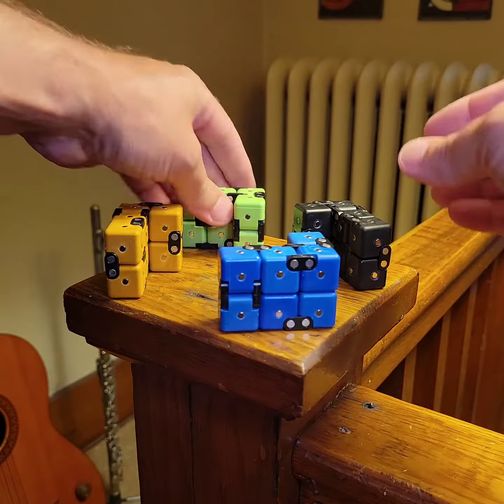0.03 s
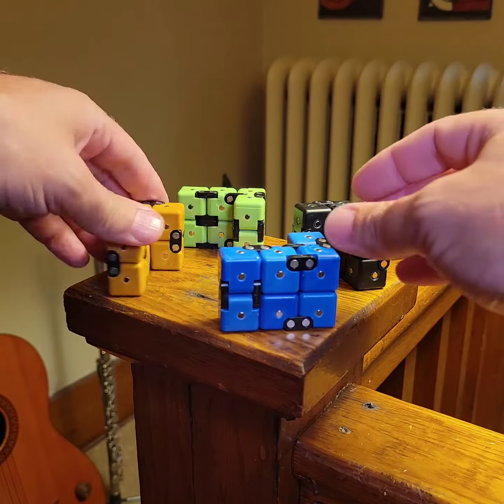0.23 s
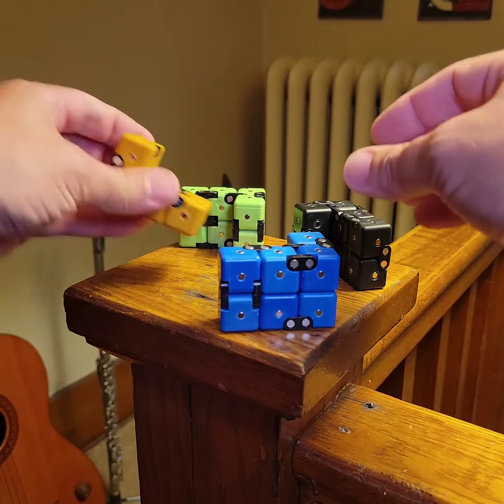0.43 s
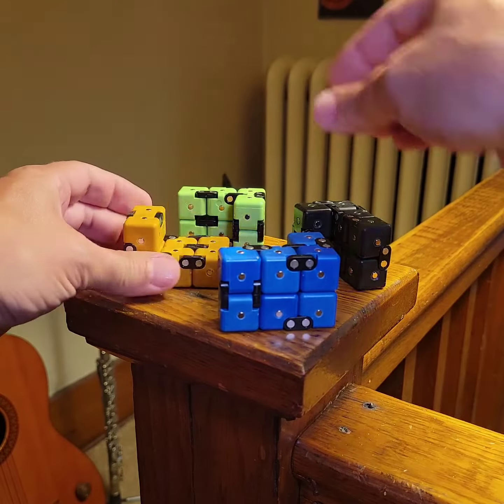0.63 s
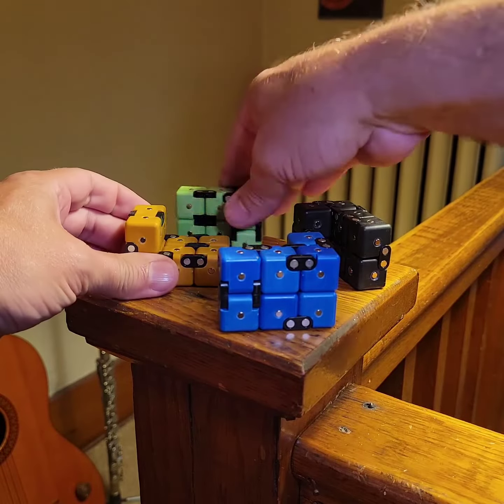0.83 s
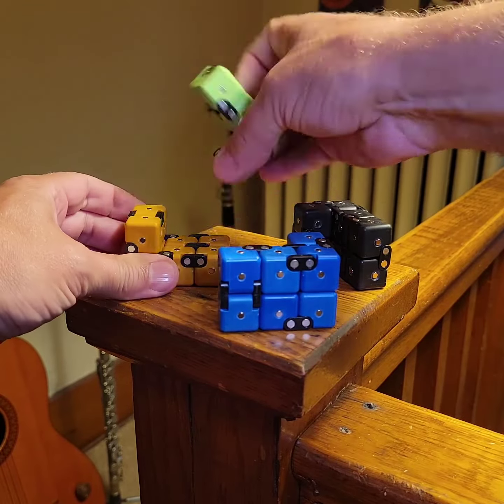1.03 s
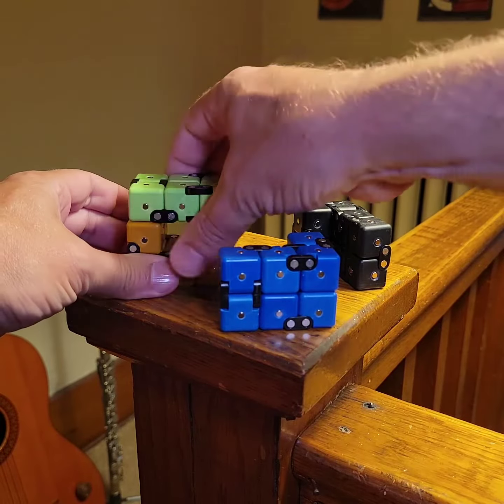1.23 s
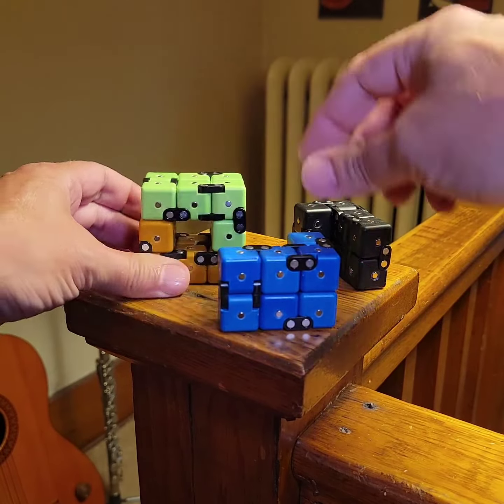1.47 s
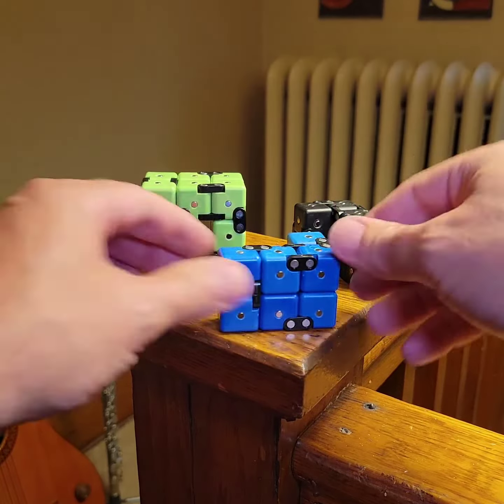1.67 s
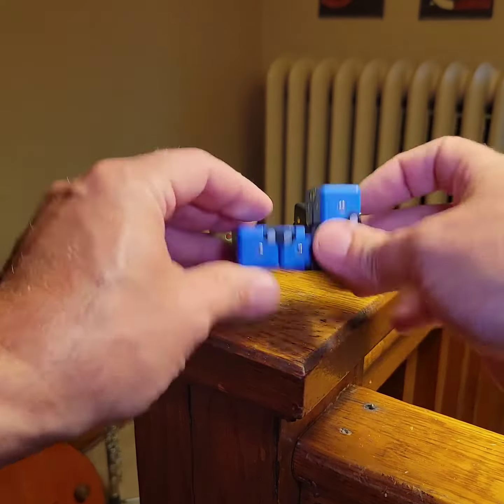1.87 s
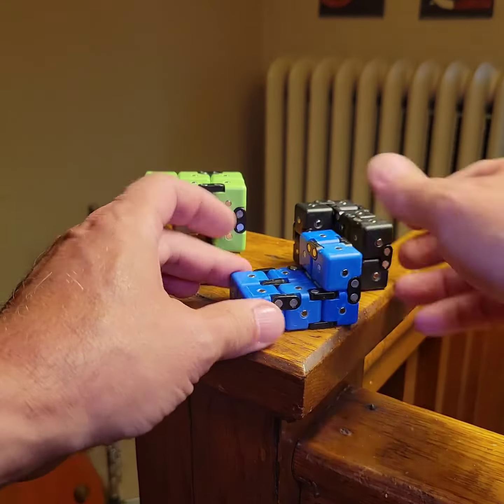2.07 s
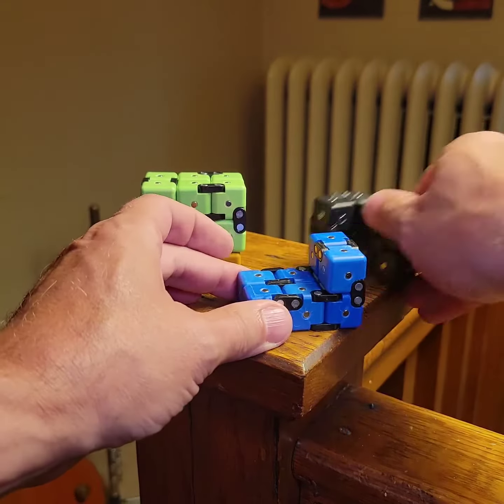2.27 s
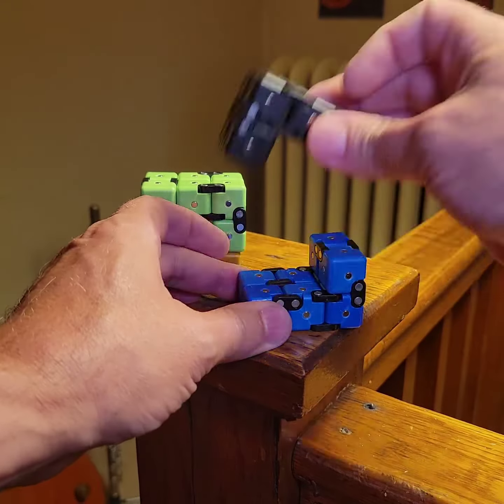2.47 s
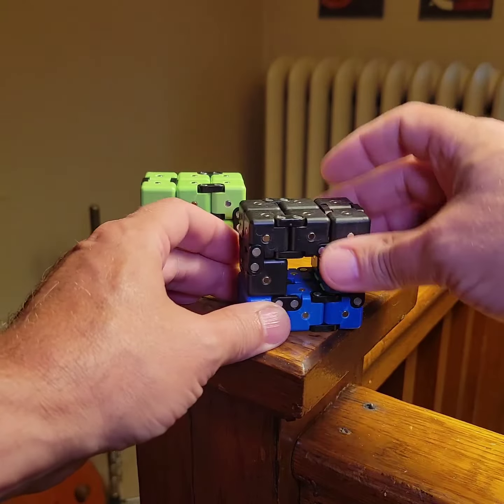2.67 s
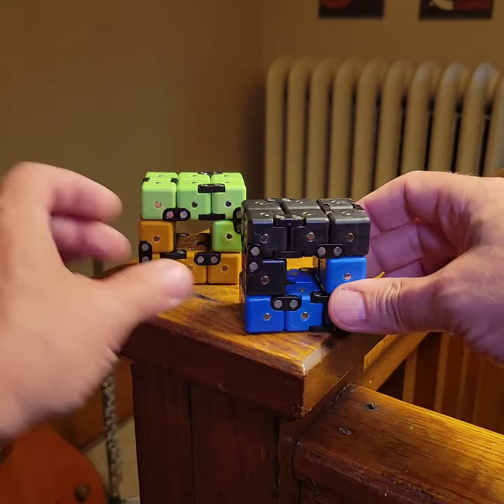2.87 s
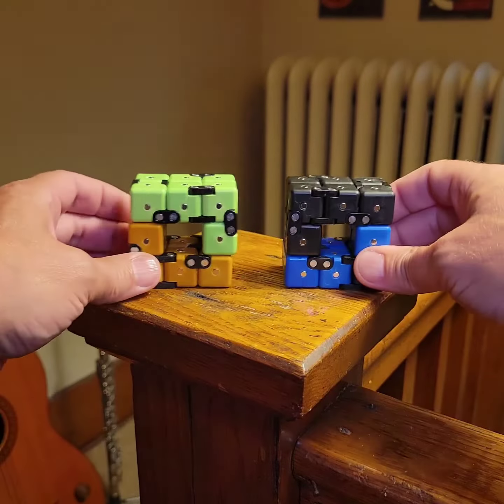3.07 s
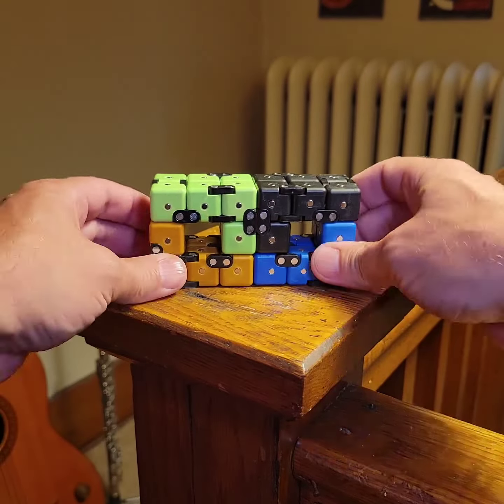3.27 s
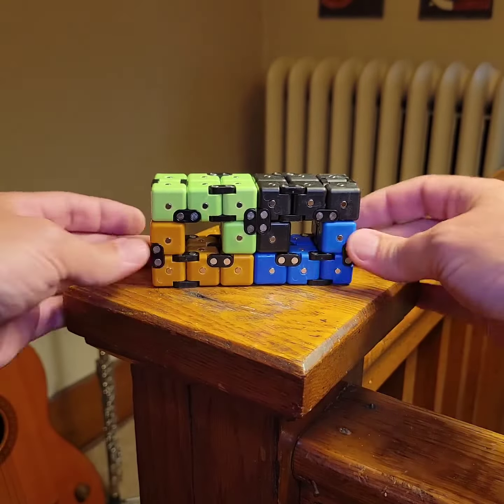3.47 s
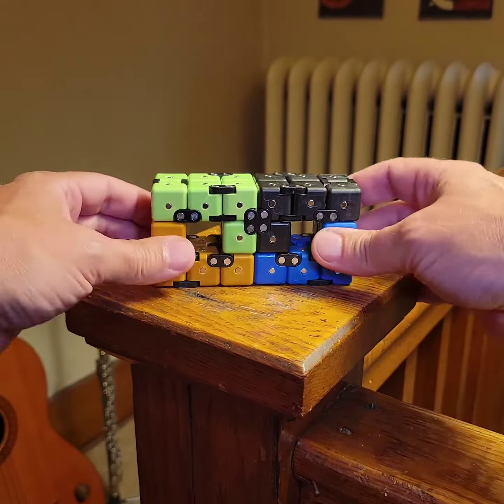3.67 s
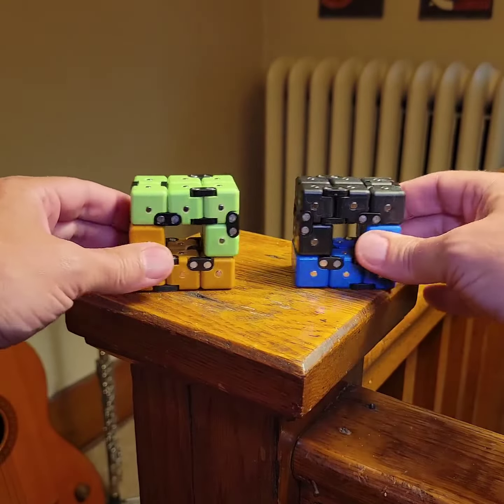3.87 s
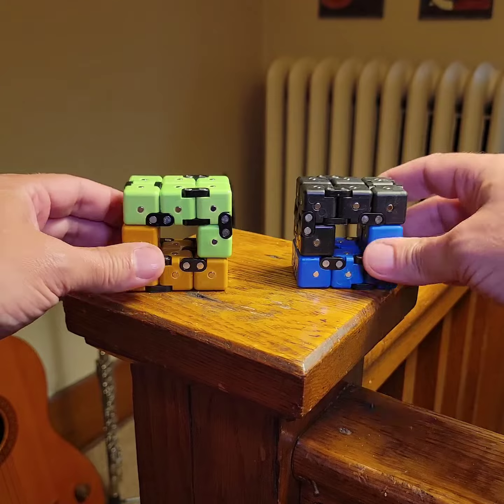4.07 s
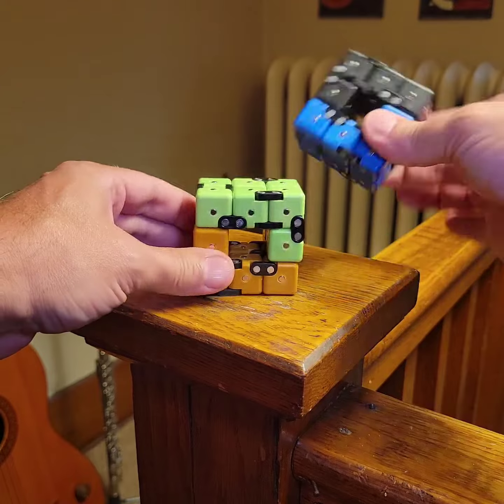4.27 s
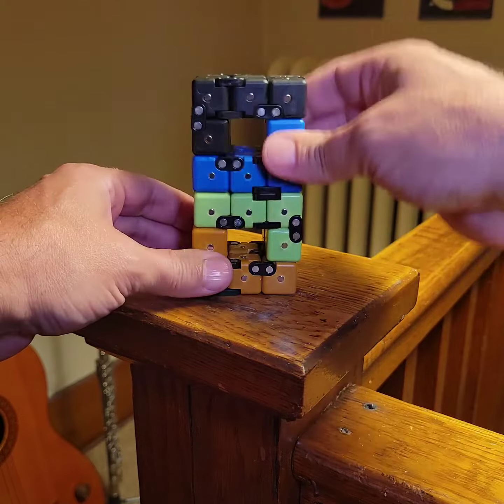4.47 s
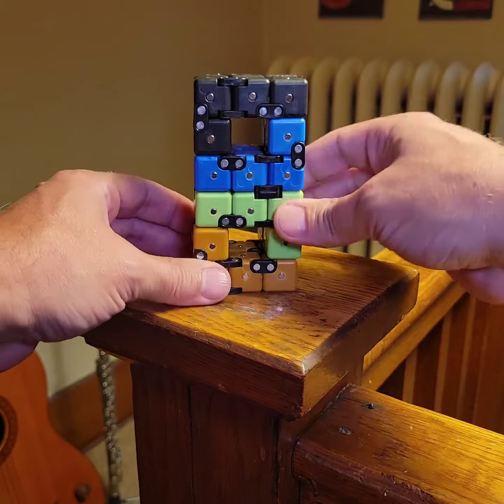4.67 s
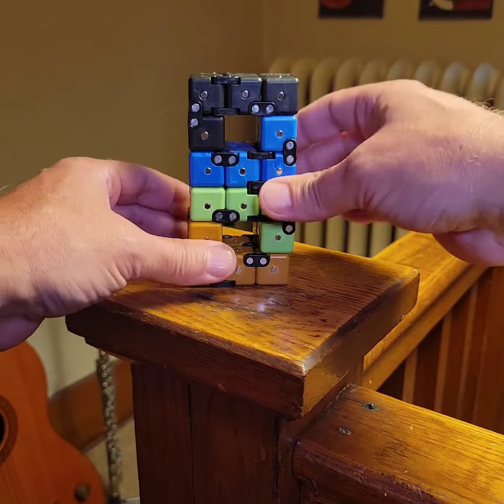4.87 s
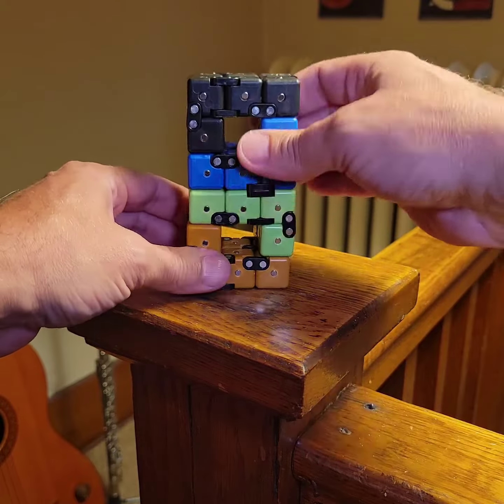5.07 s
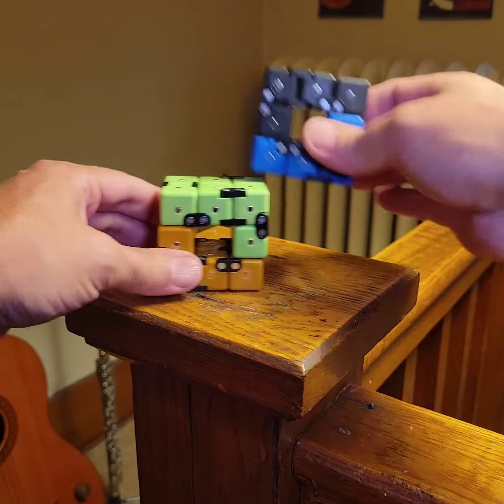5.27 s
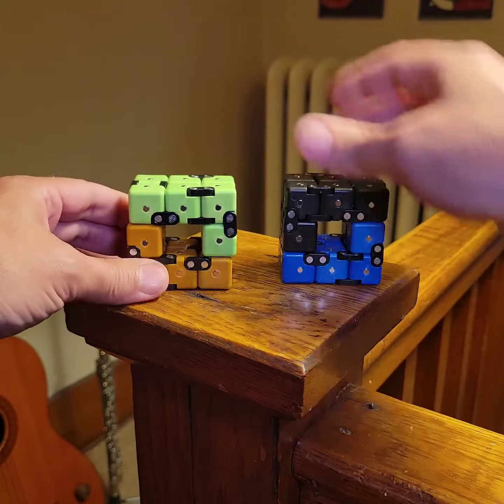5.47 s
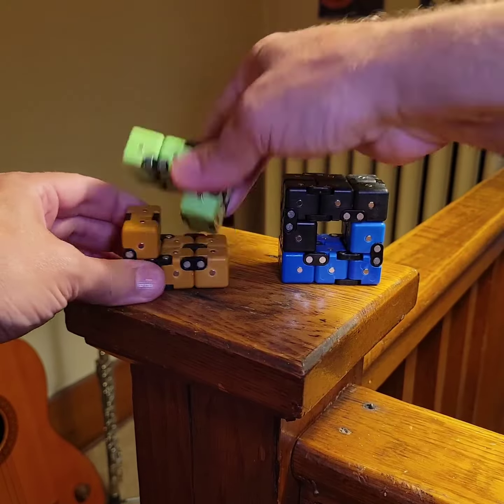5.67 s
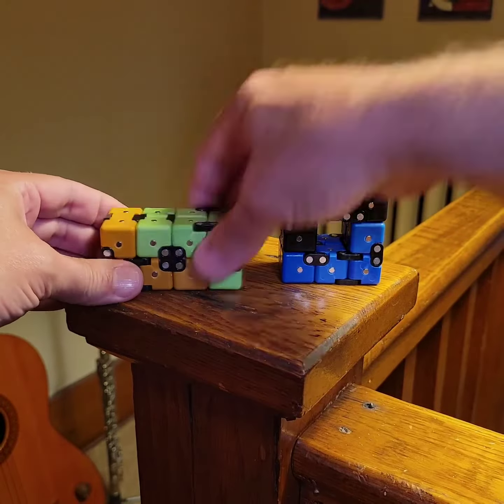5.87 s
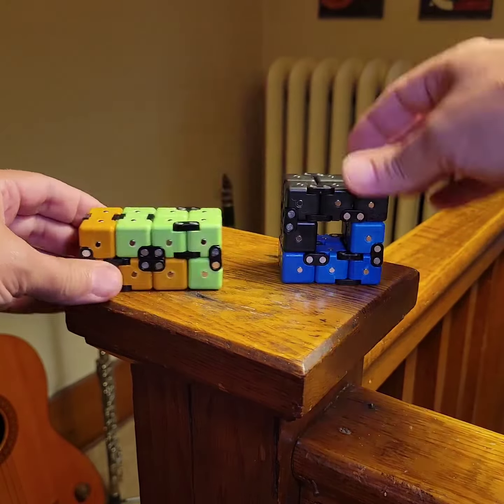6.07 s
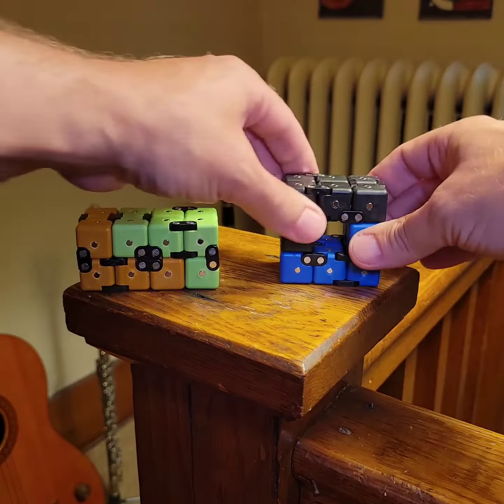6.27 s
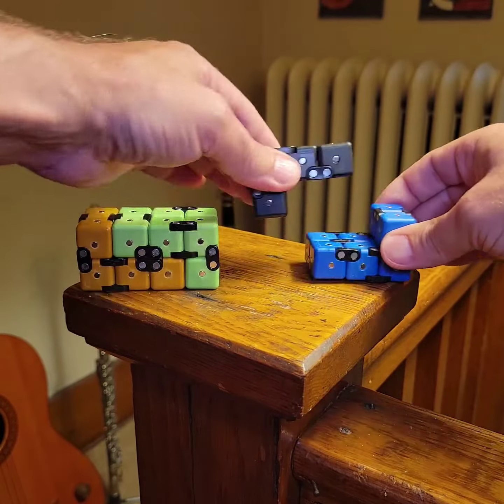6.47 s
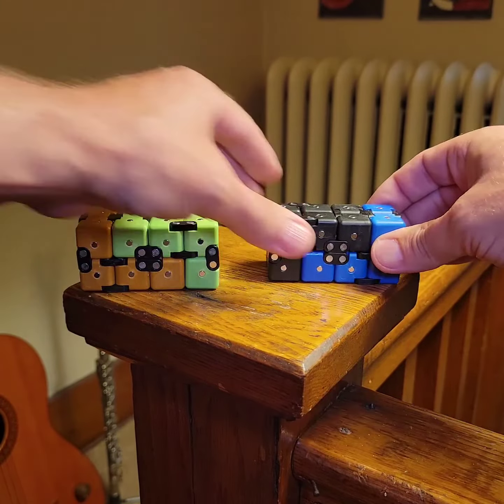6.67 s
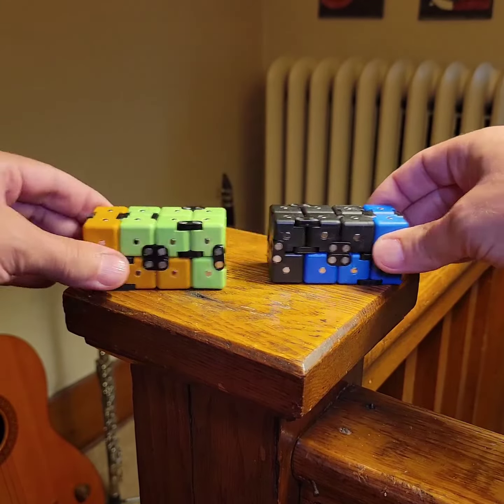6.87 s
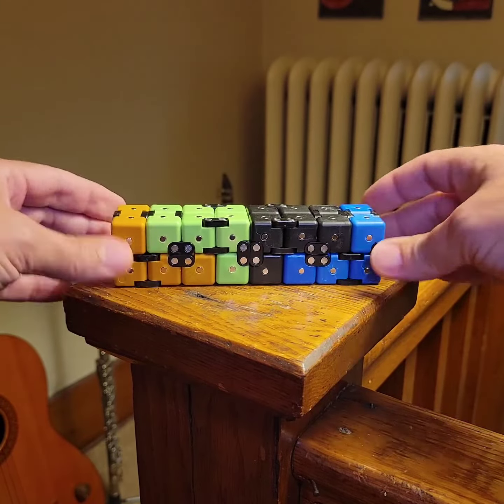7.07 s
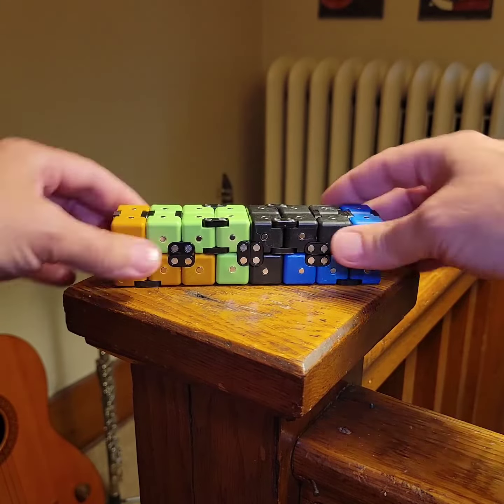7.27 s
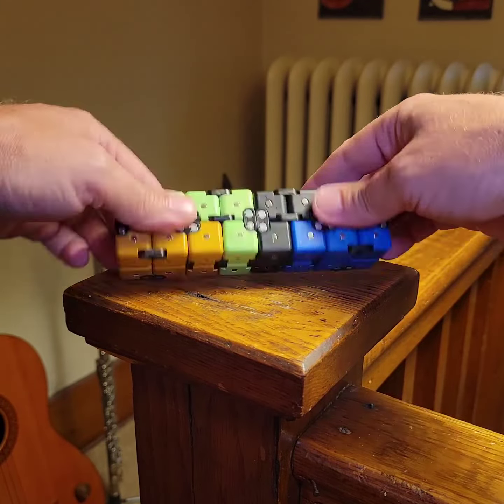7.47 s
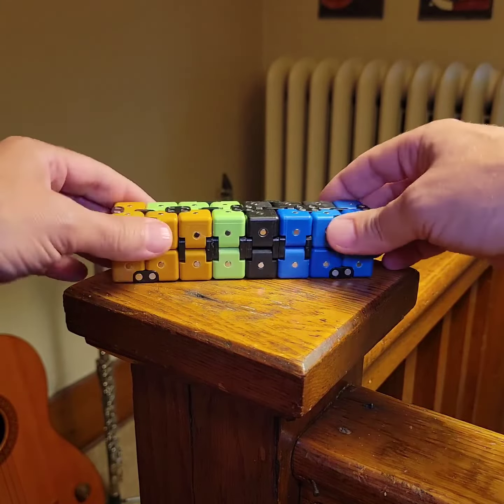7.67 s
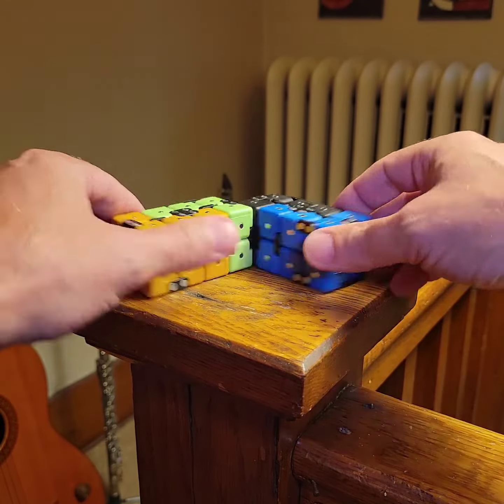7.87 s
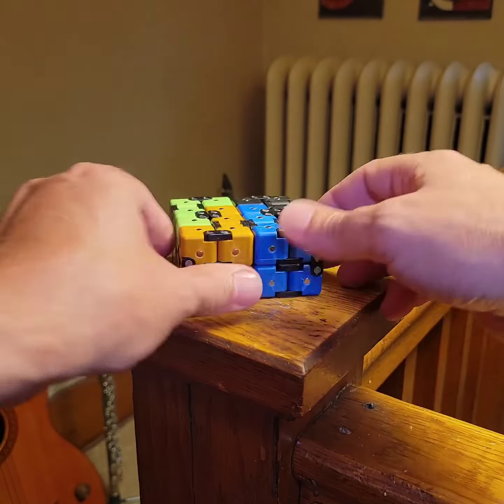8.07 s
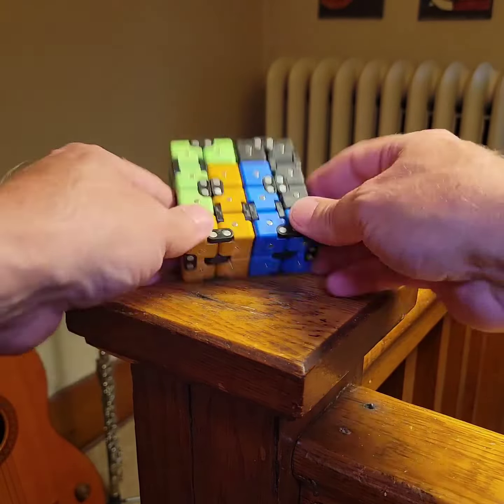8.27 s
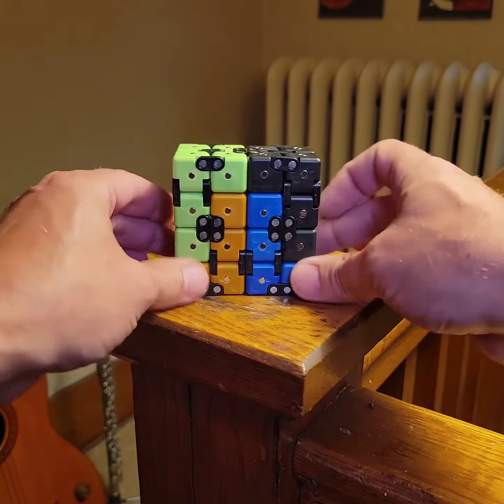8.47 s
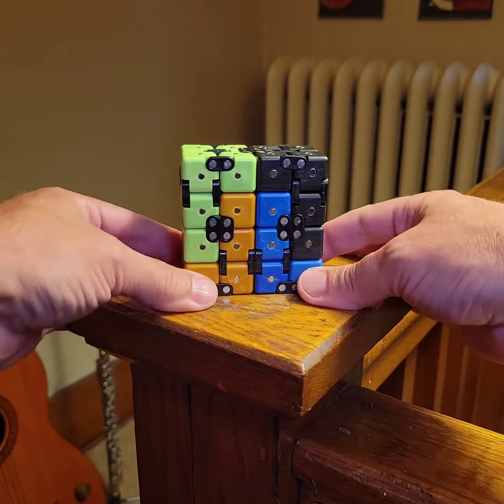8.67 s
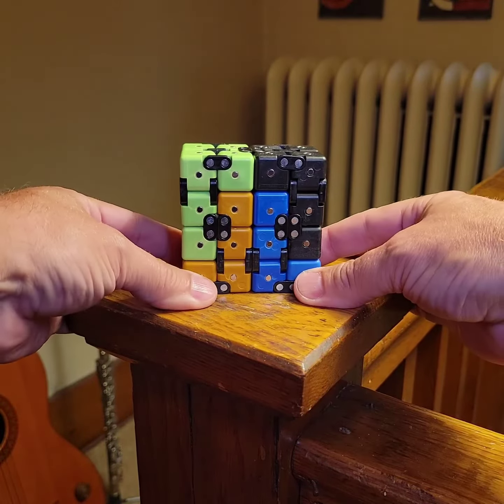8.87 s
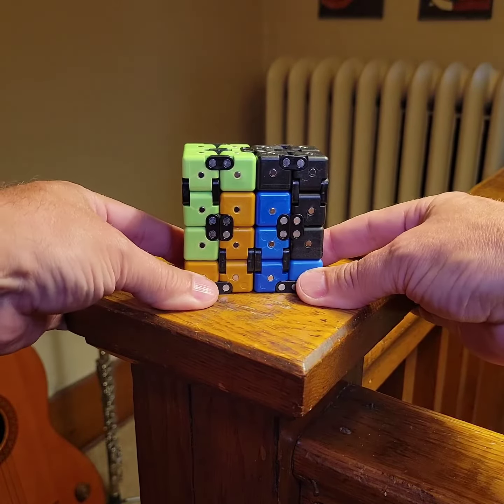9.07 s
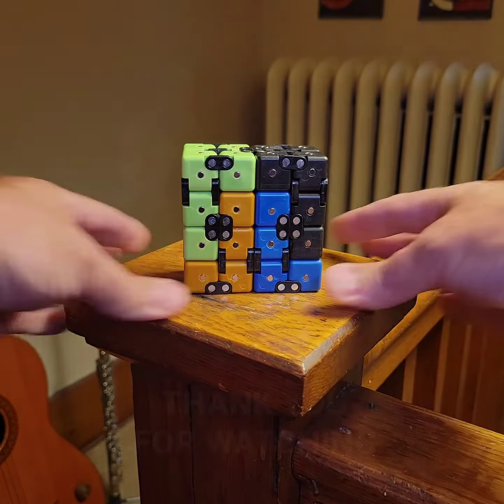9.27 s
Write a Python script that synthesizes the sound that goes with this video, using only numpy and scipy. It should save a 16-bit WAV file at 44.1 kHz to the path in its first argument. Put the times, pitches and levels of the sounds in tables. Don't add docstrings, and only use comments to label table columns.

```python
import sys
import numpy as np
from scipy import signal
from scipy.fft import rfft, irfft, next_fast_len
from scipy.io import wavfile
from scipy.ndimage import uniform_filter1d

SR = 44100
rng = np.random.default_rng(int(sys.argv[2]) if len(sys.argv) > 2 else 0)


def voltage_ratio(level):
    return 10 ** (np.asarray(level, float) / 20)


def master_out(mix):
    frames = np.transpose(np.atleast_2d(mix))
    ceiling = np.clip(frames, -1, 1)
    pcm = np.round(ceiling * 32767).astype(np.int16)
    wavfile.write(sys.argv[1], SR, pcm)


N = 410566

# (peak time [s], peak level [dB], rise [ms], fall [ms], main mode [Hz])
SNAPS = [(0.4398, -29, 8.1, 9.5, 3140), (1.1682, -24, 8.9, 12.4, 4830), (1.8695, -20.5, 13, 15, 4150),
         (2.4728, -22.5, 7.8, 17, 3546), (3.1998, -22.5, 9.4, 12.2, 3700), (3.676, -37, 9.7, 4.4, 3400),
         (4.0555, -63, 1.56, 12, 3170), (4.4246, -16.5, 8.1, 4.3, 3550), (5.3032, -14.5, 8.1, 11.7, 3470),
         (5.8259, -16.5, 9.3, 4.15, 4340), (6.309, -23.5, 8.8, 6.2, 4030), (6.5401, -15, 9.9, 5.1, 3796),
         (6.8569, -28.5, 6.6, 8.7, 3625), (7.486, -11.5, 1.73, 3, 3034), (7.8333, -45.5, 16.6, 6.1, 4310),
         (7.9584, -10.5, 0.71, 6.8, 3030), (8.349, -20, 9.1, 8.8, 3400)]
# (lag [ms], peak level [dB], fall [ms], main mode [Hz], left over right [dB])
HOLLOW_ANSWERS = [(1.3, -23.5, 5.8, 2100, 2.5), (2, -23, 11, 2100, -1), (0.6, -23, 16, 1400, -0.5),
                  (6.5, -27, 19, 1310, -1.5), (1.5, -29.5, 9.9, 2460, -2), (0.5, -33.5, 4.9, 1300, -2),
                  (4, -46.5, 8, 1060, -1), (2.5, -25.5, 7.4, 1630, -2.5), (3, -16.5, 6.1, 1540, -4),
                  (-3, -24.5, 19.6, 1366, -0.5), (-0.9, -26, 4.8, 1050, -4), (2.3, -23, 9.7, 1580, -3),
                  (4, -34, 11, 1800, 1), (4.5, -16, 3.4, 1200, 2), (13, -39, 11, 920, -2),
                  (2, -26.5, 4.3, 2760, 1), (4, -28, 15.7, 1530, -1.5)]
# (frequency [Hz], width [Hz], level [dB])
BLOCK_MODES = [(787, 150, 3), (1175, 87, -1.5), (1440, 100, -12), (1660, 36, -2.5), (1860, 57, -5),
               (2190, 36, -2.5), (2940, 380, 2.5), (3200, 15, -8), (4030, 110, -7.5), (5100, 410, -6.5)]
HARD_BLOWS = [
    4.0545,
    4.4232,
    6.8535,
    7.4856,
    7.9568,
]
# (time [s], peak level [dB], fall [ms], main mode [Hz])
EDGE_TICKS = [(0.4445, -38.5, 3.8, 9980), (0.7774, -66.5, 3.2, 7130), (1.1697, -33.5, 14.6, 6930),
              (1.857, -29.5, 7.6, 9100), (1.8765, -27.5, 2.6, 8200), (2.4806, -23, 4, 8850),
              (3.2072, -21.5, 3.8, 8530), (3.658, -62.5, 8, 9000), (3.681, -57.5, 8.1, 8150),
              (4.424, -21, 5, 7620), (5.1142, -58.5, 1.84, 6960), (5.122, -64, 1.3, 6600),
              (5.311, -25.5, 7.6, 7470), (5.5994, -52, 4.5, 10810), (5.8263, -13, 3.9, 7230),
              (6.3145, -41, 6.4, 8120), (6.537, -27.5, 5.5, 9660), (6.5461, -17.5, 5.1, 9620),
              (6.866, -27, 1.7, 9300), (7.4881, -36, 6.9, 7500), (7.6374, -53, 1.6, 10000),
              (7.8325, -40.5, 1.4, 7680), (7.943, -45.5, 3.6, 10570), (7.9664, -26.5, 15.3, 7500),
              (8.35, -29.5, 9.9, 7620), (8.458, -63, 12, 6500)]
# (peak time [s], peak level [dB], length [ms], frequency [Hz])
HOLLOW_RINGS = [(0.3193, -46, 5.8, 1220), (0.438, -21.5, 2.1, 2110), (0.439, -29.5, 4.1, 814),
                (0.4415, -20, 3.2, 1410), (1.1644, -29.5, 9.3, 1166), (1.1703, -26.5, 5.8, 2210),
                (1.1703, -22, 3.8, 1610), (1.8538, -24, 3.5, 1290), (1.8668, -26.0, 2.1, 1205),
                (1.8717, -24.0, 2.5, 1345), (2.4719, -30, 5.0, 1210), (2.4729, -30.5, 12.5, 2204),
                (2.4789, -28, 7.5, 1720), (2.4804, -26.0, 6.9, 817), (2.9104, -46, 4.4, 1690),
                (2.9528, -47, 10.0, 782), (3.1997, -31, 7.4, 1980), (3.2057, -31, 5.3, 2100),
                (3.6756, -29, 7.0, 1160), (3.6781, -30, 4.7, 1784), (4.0588, -34.5, 1.8, 1118),
                (4.4244, -26.5, 3.7, 1980), (4.4249, -24.5, 2.9, 1217), (4.4384, -33, 21, 1730),
                (5.3054, -17, 8.1, 2166), (5.3064, -18.0, 3.0, 1767), (5.3069, -18.0, 4.0, 1340),
                (5.8218, -27.5, 5.0, 1650), (5.8273, -27.5, 6.7, 1300), (5.8382, -30.5, 23, 1210),
                (6.3077, -28.5, 9.0, 1220), (6.3107, -27, 7.9, 1595), (6.3191, -33.5, 2.5, 1460),
                (6.4538, -48, 4.5, 1550), (6.5401, -23.0, 3.7, 1082), (6.5406, -22.5, 5.2, 1425),
                (6.5416, -23.5, 2.1, 2080), (6.8584, -34, 11.5, 1156), (7.4306, -44, 13.5, 735),
                (7.4885, -15, 9.7, 1201), (7.5015, -27.5, 7.8, 730), (7.5174, -29.5, 5, 780),
                (7.8447, -39.5, 4.0, 1270), (7.8472, -41.5, 6.0, 780), (7.9494, -51, 5.2, 780),
                (7.9594, -32.0, 3.0, 1130), (7.9689, -44, 13.5, 952), (8.3525, -29.5, 8.5, 1287),
                (8.355, -28.0, 2.5, 1890), (8.3605, -27.5, 2.0, 780)]
# (peak time [s], peak level [dB], length [ms], frequency [Hz])
FACE_RINGS = [(0.3168, -61.5, 6.0, 2790), (0.435, -38, 4.5, 3530), (0.4395, -36.5, 7.5, 3970),
              (0.44, -23, 4.0, 3020), (1.1639, -34.5, 11, 4090), (1.1659, -24, 4.5, 4700),
              (1.1703, -28.0, 3.8, 5340), (1.8698, -24.5, 7.5, 4004), (1.8702, -25.5, 7, 4780),
              (1.8742, -25.5, 7.5, 4110), (2.4704, -31.5, 13, 3130), (2.4729, -22.5, 3.9, 3710),
              (2.4784, -27.5, 13.0, 3120), (2.4794, -33, 2.9, 5580), (2.9244, -58.0, 8.5, 3230),
              (2.9318, -55, 17.5, 3130), (3.1957, -29.5, 8.0, 4160), (3.1967, -27.0, 8.7, 3100),
              (3.6717, -49, 4.0, 4950), (3.6756, -40, 8.5, 3590), (4.0548, -61.0, 2.0, 2760),
              (4.4244, -21.5, 5.5, 3580), (4.4244, -21.0, 8.0, 3005), (4.4289, -19.5, 2.7, 3100),
              (5.301, -17, 5.0, 3050), (5.3044, -24.0, 14.5, 4050), (5.3044, -19, 2.0, 3470),
              (5.8228, -25.5, 6.7, 3560), (5.8258, -18.5, 2.7, 6330), (5.8273, -23.5, 3.0, 5770),
              (6.3052, -24.5, 6.0, 4440), (6.3087, -24.5, 5.9, 2950), (6.3097, -29, 5.1, 4960),
              (6.4518, -60.5, 2.0, 4140), (6.5396, -23.0, 6.5, 4730), (6.5396, -22.0, 6.8, 4170),
              (6.5411, -18.5, 2.5, 3170), (6.8559, -35.5, 5.0, 4010), (7.4261, -72.5, 3.0, 3100),
              (7.4865, -28.5, 2.4, 4780), (7.4865, -18.5, 3.1, 3100), (7.487, -25.0, 2.2, 4310),
              (7.8327, -46.5, 2.0, 5900), (7.8332, -48.5, 3.5, 3190), (7.941, -40, 4.5, 4200),
              (7.9594, -18, 5.0, 3030), (7.9619, -21, 4.77, 2444), (8.3485, -25, 8.5, 2963),
              (8.351, -24, 2.4, 4690), (8.3545, -28.5, 12, 2993)]
# (peak time [s], peak level [dB], hold before it [ms], fall [ms], mode [Hz])
POST_THUDS = [(.481, -46, 35, 11.7, 83), (1.2142, -46, 57, 12.4, 71), (1.8813, -41.5, 22, 13.3, 74),
              (2.2638, -55, 17, 8.8, 72), (2.4921, -37, 20, 31, 75), (3.2162, -47.5, 23, 24, 84),
              (3.689, -49.5, 23, 34, 97), (4.43, -38.5, 14, 22.4, 63), (5.1221, -43, 16, 11.4, 78),
              (5.3206, -29.5, 9.9, 17.6, 76), (5.6137, -43.5, 20.7, 11, 73), (5.8378, -33, 10.7, 12, 74),
              (6.3219, -44, 4.1, 31, 90), (6.5536, -44, 7.7, 27, 105), (6.8794, -42.5, 15.3, 11, 63),
              (7.5059, -34.5, 23, 10.5, 70), (7.8381, -47.5, 30, 29, 68), (7.9659, -53.5, 51, 28, 72),
              (8.3657, -31.5, 13, 31.5, 79)]
# (time [s], peak level [dB], rise [ms], fall [ms], main mode
# [Hz])
TOUCHES = [(.004, -55, 12, 15, 1290), (.453, -44.5, 5.6, 15, 770), (.47, -56.5, 5, 2.7, 6800),
           (.622, -66, 7.4, 6.1, 760), (1.175, -42, 6.2, 13, 338), (1.853, -31.5, 11, 4.1, 2530),
           (1.884, -36.5, 12, 9.2, 756), (3.211, -36, 5.2, 19.3, 696), (6.548, -29.5, 5.1, 11.6, 721.5),
           (2.92, -53, 26, 43, 308), (4.059, -48.5, 1.8, 9.2, 490), (4.4291, -22, 1.1, 2.6, 3570),
           (4.427, -35.5, 3.7, 15.5, 244), (5.077, -66, 8.3, 24, 1500), (5, -50, 5.9, 12, 410),
           (6.4, -55, 11.9, 18.5, 1400), (6.825, -62.5, 3.6, 28, 1003), (7.392, -58, 8.1, 24, 1335),
           (7.497, -36.5, 9.3, 4.9, 332), (7.512, -37.5, 9.3, 17, 714), (7.827, -40, 2.6, 2.5, 7450),
           (0.32, -60, 7.1, 11, 485), (8.355, -33.5, 3.06, 21, 706), (8.459, -59, 11, 11.3, 1553),
           (.312, -70, 8.3, 7.2, 3000), (.428, -46.5, 10, 7.5, 2500), (2.261, -72.5, 12, 9.6, 3000),
          (2.267, -74, 5, 4.6, 4900), (2.456, -47.5, 4.3, 10, 3800), (2.96, -65.5, 23, 15, 3300),
          (2.965, -59, 18, 16, 1600), (5.07, -68.5, 7.1, 17, 3200), (5.101, -62, 2, 2.8, 2600),
          (5.114, -54, 5.3, 6, 793), (5.811, -37.5, 7, 8.8, 4530), (6.457, -54, 9, 12, 1380),
          (6.84, -66, 13.6, 8.2, 3930), (7.803, -64, 8, 6, 2750), (7.822, -48.5, 11, 17, 3000),
          (7.885, -55.5, 22, 25, 325), (7.936, -54.5, 11, 15, 4200), (8.315, -68, 7.7, 12, 4480),
          (8.337, -45, 6, 10, 4200)]
# (peak time [s], rise [ms], body [dB], faces [dB], edges [dB])
SLIDES = [(.03, 55, -67.5, -72.5, -99), (0.225, 39, -74.5, -83, -82.5), (.319, 7.1, -52.5, -74, -72),
          (.468, 5.1, -40.5, -42, -57), (2.503, 7, -32, -36, -56), (.778, 12, -67, -68.5, -72),
          (1.6446, 9.8, -74, -77, -91), (1.709, 20, -62.5, -80, -73), (2.2107, 23, -63, -87.5, -92),
          (2.265, 14, -63.5, -81, -78), (2.925, 30, -53, -59, -66.5), (4.09, 31, -60.5, -67.5, -75),
          (4.656, 23.6, -73, -74.5, -74), (5.116, 12, -57.5, -60, -87), (5.563, 19, -55.5, -80.5, -83.5),
          (5.607, 10.7, -52.5, -64.5, -81), (6.455, 11, -51, -54.5, -79), (7.405, 27.6, -57, -62.5, -68.5),
          (7.63, 5.9, -56.5, -53.5, -77), (7.67, 17.8, -58.5, -64.5, -71), (7.74, 14.4, -59.5, -64, -76),
          (7.942, 14, -50.5, -44, -68), (8.212, 19.7, -59.5, -64, -65), (8.68, 25, -69.5, -85, -92)]
# (time [s], level [dB])
HAND_PRESSURE = [(0.0, -69.5), (1.0, -74.5), (1.25, -68.5), (1.63, -77.5), (2.35, -70), (3.4, -77.5),
                 (3.62, -70), (4.76, -75.5), (5.25, -61), (5.99, -73), (6.32, -72.5), (7.19, -79),
                 (7.69, -63), (8.05, -71), (8.5, -68.5), (8.6, -71)]
# (frequency [Hz], level per Hz [dB])
RUMBLE = [(13, -41.5), (22, -16), (59, -3), (74, -1), (141, -20.5), (170, -24.5), (220, -49), (370, -120)]
# (frequency [Hz], level per Hz [dB])
AIR = [(76, -46.5), (130, -6), (156, -16.5), (194, -2), (303, -3.5), (393, -6), (459, -10.5), (700, -24),
       (910, -45.5), (1540, -120)]
# (frequency [Hz], level per Hz [dB])
RUSTLE = [(350, -35), (550, -6), (830, -4), (1300, -10.5), (1900, -14), (2300, -23), (6000, -31),
          (8000, -57.5)]
# (frequency [Hz], width [Hz], level [dB])
HUM = [(877, 15, -77), (1560, 25, -83.5), (3000, 60, -90), (9000, 280, -97.5), (9300, 180, -99)]
# (frequency [Hz], level per Hz [dB])
HISS = [(1500, -35), (3000, -1), (7000, -5), (9500, -0.5), (15000, -4)]
# (frequency [Hz], time to fall by 60 dB [s])
ROOM_DECAY = [(60, 0.97), (350, 0.31), (1000, 0.12), (3000, 0.14), (8000, 0.14), (15000, 0.012)]
# (time [s], level [dB])
FADE = [(0, -3.5), (8.6, -3.5), (8.8, -4.5), (8.95, -21), (9.05, -43), (9.31, -57.5)]

FAINT_DB = -62
ECHO_DELAY = 250
PORTS = np.array([[0.5], [-0.5]])


def unit(x):
    return x / np.sqrt(np.mean(x ** 2) + 1e-20)


def along(points, hz):
    f, v = np.transpose(points)
    return np.interp(np.log(hz + 1), np.log(f + 1), v)


def curve(points):
    s, value = np.transpose(points)
    return np.interp(np.arange(N) / SR, s, value)


def room_tail():
    hz, t, z = signal.stft(rng.standard_normal((2, SR // 4)), SR, nperseg=256)
    decay_s = np.maximum(along(ROOM_DECAY, hz), 0.02)[:, None]
    answer = signal.istft(z * voltage_ratio(-60 * t / decay_s), SR, nperseg=256)[1]
    return answer / np.linalg.norm(answer[0])


def contacts(table, lo_hz, hi_hz, under_db, over_db, near, peak_db, shared, soft, early_db, grain_db,
             bands_db, alike, trim_db, wet_db):
    out, lead = np.zeros((2, N + SR)), SR // 16
    t = (np.arange(8192) - lead) / SR
    hz = np.fft.rfftfreq(len(t), 1 / SR) + 1
    walls = 1 + shared * sum(voltage_ratio(db) / (1 + (2 * (hz - c) / w) ** 2) for c, w, db in BLOCK_MODES)
    for s, db, rise_ms, fall_ms, main_hz, pan_db in table:
        rise, fall = max(rise_ms, 0.3) / 1000, max(fall_ms, 0.3) / 1000
        steep = soft + (0.0048 / rise) ** 2
        shape = voltage_ratio(np.where(t < 0, -10 * np.abs(t / rise) ** steep, -10 * t / fall))
        shape += voltage_ratio(early_db - 10 * np.abs(t / 0.009) ** 3) * (t < 0)
        tiny_impacts = np.convolve(rng.standard_normal(len(t)), np.hanning(90), "same")
        shape *= voltage_ratio(grain_db * unit(tiny_impacts))

        edge_hz = min(lo_hz, np.min(main_hz))
        band_db = under_db * np.minimum(np.log2(hz / edge_hz), 0)
        band_db -= over_db * np.maximum(np.log2(hz / hi_hz), 0)
        peaks = sum(1 / (1 + (np.log(hz / m) / near) ** 2) ** 2 for m in np.atleast_1d(main_hz))
        modes = 1 + voltage_ratio(peak_db) * peaks
        grip = uniform_filter1d(rng.standard_normal(len(hz)), size=14)
        modes *= voltage_ratio(bands_db * unit(grip))

        turn = 2 * np.pi * (rng.random(len(hz)) + (1 - alike) * rng.random((2, len(hz))))
        burst = shape * irfft(voltage_ratio(band_db) * walls * modes * np.exp(1j * turn), len(t))
        burst *= np.linalg.norm(shape) / np.linalg.norm(burst, axis=1, keepdims=True)
        burst *= voltage_ratio(db + trim_db + pan_db * PORTS)
        start = round(s * SR) + SR // 8 - lead
        out[:, start:start + len(t)] += burst
        if db > FAINT_DB:
            echo = voltage_ratio(wet_db) * signal.fftconvolve(burst, room_tail(), axes=1)
            start += ECHO_DELAY
            out[:, start:start + echo.shape[1]] += echo
    return out[:, SR // 8:][:, :N]


def slides(part, main_hz):
    return [(s, db[part], rise, rise, main_hz, -1.5) for s, rise, *db in SLIDES]


def hollow_clack():
    body = slides(0, (750, 1250, 1650))
    for (s, _, rise, *_), (lag, db, fall, hz, pan_db) in zip(SNAPS, HOLLOW_ANSWERS):
        body.append((s + lag / 1000, db, rise + 0.5 * lag, fall, hz, pan_db))
    return contacts(body, 970, 2200, under_db=13.5, over_db=40.0, near=0.45, peak_db=9.0, shared=2.3, soft=1.3,
                    early_db=-24.0, grain_db=2.5, bands_db=2.5, alike=0.13, trim_db=1.68, wet_db=-9.5)


def face_click():
    faces = [(*snap, -2.5) for snap in SNAPS]
    return contacts(faces, 2500, 6000, under_db=36.5, over_db=91, near=0.39, peak_db=4.5, shared=1.0, soft=1.2,
                    early_db=-27.5, grain_db=3.5, bands_db=1.4, alike=0.11, trim_db=-0.93, wet_db=-14.5)


def edge_tick():
    rise_ms, pan_db = 2.4, 0.5
    edges = slides(2, 9600)
    edges += [(s, db, rise_ms, fall, hz, pan_db) for s, db, fall, hz in EDGE_TICKS]
    return contacts(edges, 4300, 14000, under_db=88.5, over_db=20, near=0.39, peak_db=4.5, shared=0, soft=1.0,
                    early_db=-27.5, grain_db=3.0, bands_db=2.5, alike=0.15, trim_db=1.5, wet_db=-15.5)


def single_rings():
    table = HOLLOW_RINGS + FACE_RINGS
    out, lead = np.zeros((2, N + SR)), 2048
    t = (np.arange(3 * lead) - lead) / SR
    chance = rng.standard_normal((len(table), 3))
    for (s, db, length_ms, hz), (turn, side, pan) in zip(table, chance):
        u = 1000 * t / length_ms
        shape = voltage_ratio(np.where(u < 0, -6 * (u / 0.55) ** 2, -6 * np.abs(u / 0.6) ** 1.6))
        wave = np.sin(2 * np.pi * (hz * t + turn) + np.sign(side) * PORTS * np.pi / 2)
        sharp = np.hypot(1, 5.1 / length_ms)
        level = voltage_ratio(db - 0.5 + 3.5 * pan * PORTS) * sharp
        out[:, round(s * SR) - lead:][:, :len(t)] += level * shape * wave
    dry_rings = out[:, :N]
    echo = signal.fftconvolve(dry_rings, room_tail(), axes=1)[:, :N - ECHO_DELAY]
    return dry_rings + voltage_ratio(-12.5) * np.pad(echo, ((0, 0), (ECHO_DELAY, 0)))


def post_thud():
    knocks = [(*row, -0.1) for row in POST_THUDS]
    return contacts(knocks, 61, 77, under_db=10.5, over_db=5, near=0.33, peak_db=16.5, shared=0, soft=6.7,
                    early_db=-58.5, grain_db=3, bands_db=-0.5, alike=0.2, trim_db=2.5, wet_db=-23.5)


def light_touches():
    touches = [(*row, -0.1) for row in TOUCHES]
    return contacts(touches, 150, 15500, under_db=14.0, over_db=55.0, near=0.43, peak_db=45.0, shared=2.1,
                    soft=2.5, early_db=-61.0, grain_db=2.5, bands_db=6.5, alike=0.46, trim_db=4.5, wet_db=-26.5)


def face_squeak():
    return contacts(slides(1, (3100, 4050)), 3000, 5600, under_db=32.0, over_db=59.0, near=0.031, peak_db=8,
                    shared=0.95, soft=4.1, early_db=-40.0, grain_db=2.5, bands_db=3, alike=0.3, trim_db=-0.5,
                    wet_db=-16.5)


def blocks():
    plastic = hollow_clack() + face_click() + edge_tick() + single_rings() + light_touches() + face_squeak()
    ahead = np.subtract.outer(HARD_BLOWS, np.arange(N) / SR)
    closeness = np.sum((ahead > 0) * np.exp(-np.abs(ahead) / 0.006), axis=0)
    hush = voltage_ratio(-15 * closeness)
    return plastic * uniform_filter1d(hush, size=24) + post_thud()


def rush(gain, patchy_db):
    z = signal.stft(rng.standard_normal((2, N)), nperseg=512)[2]
    field = uniform_filter1d(rng.standard_normal(z.shape[1:]), 4, 0)
    field = uniform_filter1d(field, 8, 1)
    pair = signal.istft(z * voltage_ratio(patchy_db * unit(field)), nperseg=512)[1][:, :N]
    m = next_fast_len(N)
    return unit(irfft(rfft(pair, m) * gain(np.fft.rfftfreq(m, 1 / SR)), m)[:, :N])


def shaped_rush(spectrum, patchy_db):
    return rush(lambda hz: voltage_ratio(along(spectrum, hz)), patchy_db)


def hum_bands(hz):
    return sum(voltage_ratio(db) / np.sqrt(w) / (1 + ((hz - c) / w) ** 2) for c, w, db in HUM)


def background():
    press_db = curve(HAND_PRESSURE)
    rumble = voltage_ratio(press_db + 9) * shaped_rush(RUMBLE, patchy_db=0.5)
    air = voltage_ratio(-63) * shaped_rush(AIR, patchy_db=3.0)
    rustle_db = -70 + 0.14 * (press_db - press_db.mean())
    rustle = voltage_ratio(rustle_db) * shaped_rush(RUSTLE, patchy_db=4.0)
    hum = voltage_ratio(-77.5) * rush(hum_bands, patchy_db=1.5)
    hiss = voltage_ratio(-84.0) * shaped_rush(HISS, patchy_db=-0.5)
    return (rumble + air + rustle + hum + hiss) * voltage_ratio([[-0.8], [0.8]])


def scene():
    return blocks() + background()


def top_cut(x):
    return signal.sosfilt(signal.butter(12, 17000, fs=SR, output="sos"), x)


def record(dry):
    faded = dry * voltage_ratio(curve(FADE)) + voltage_ratio(-106) * rng.standard_normal(dry.shape)
    top_hz = 16050
    treble_cut = voltage_ratio(-6 * (np.fft.rfftfreq(N, 1 / SR) / top_hz) ** 80)
    mix = irfft(rfft(faded) * treble_cut, N)
    return top_cut(mix)


dry = scene()
out = record(dry)
master_out(out)
```